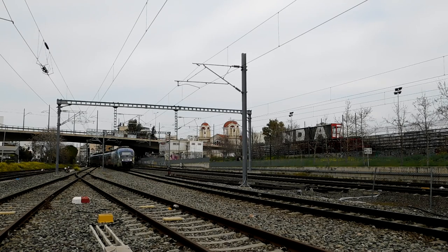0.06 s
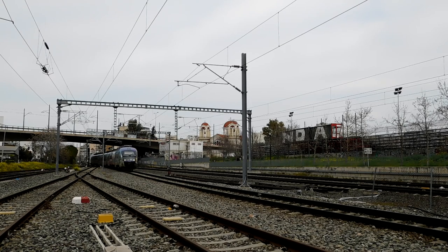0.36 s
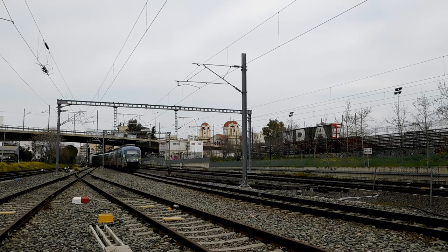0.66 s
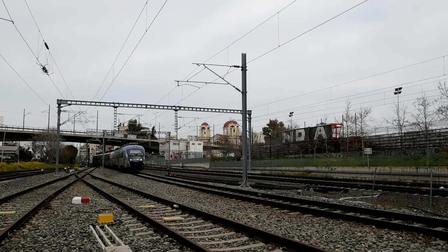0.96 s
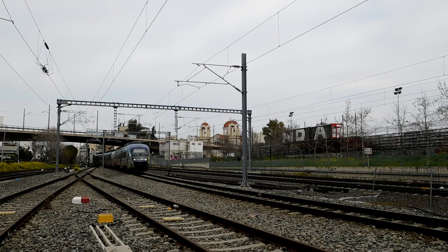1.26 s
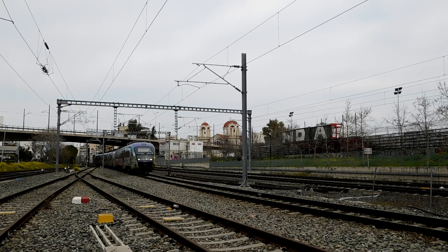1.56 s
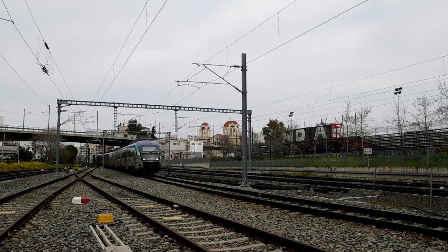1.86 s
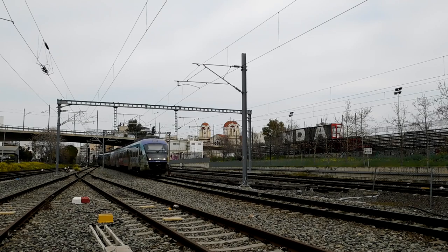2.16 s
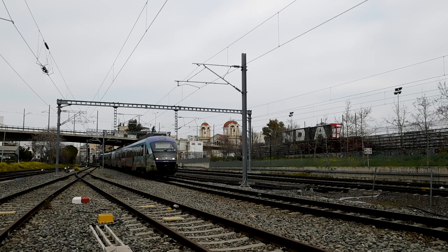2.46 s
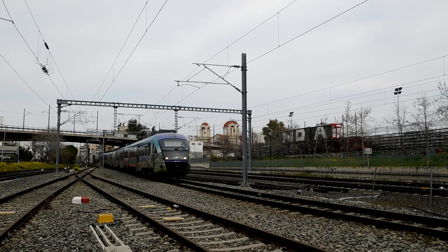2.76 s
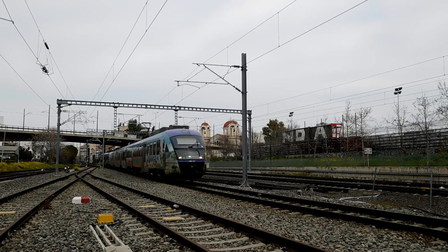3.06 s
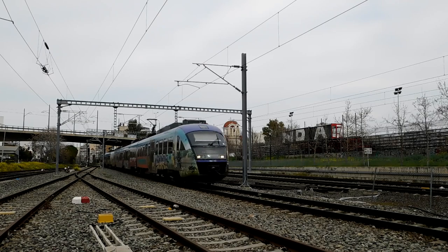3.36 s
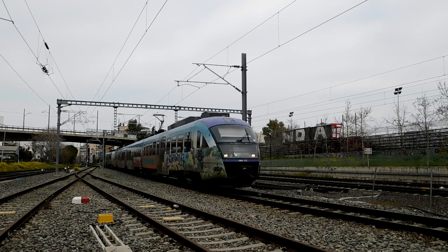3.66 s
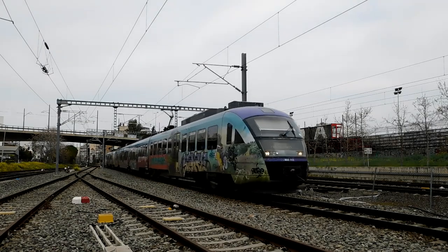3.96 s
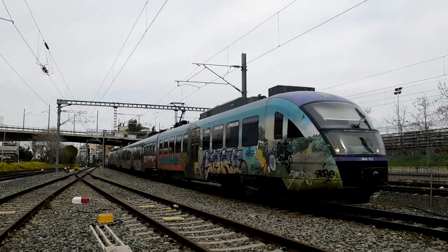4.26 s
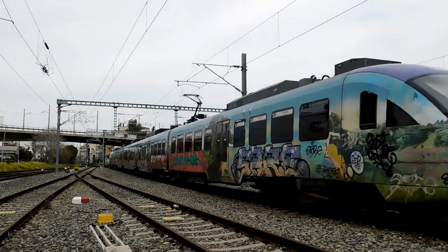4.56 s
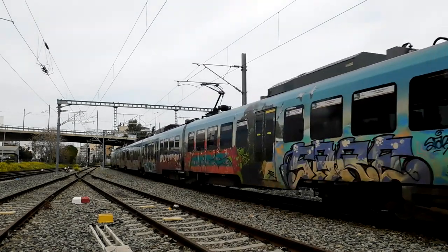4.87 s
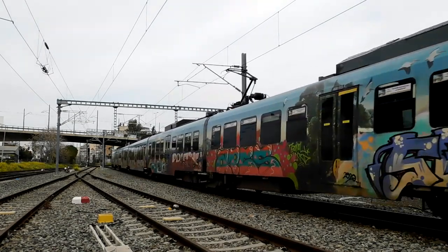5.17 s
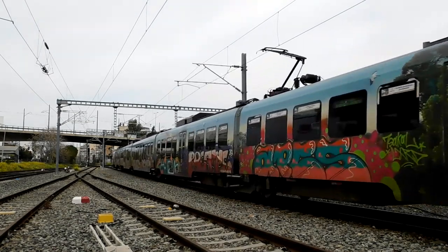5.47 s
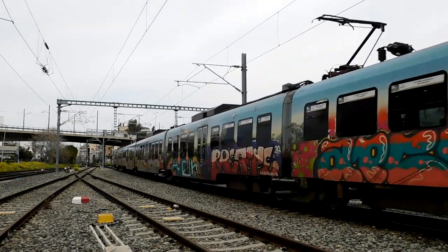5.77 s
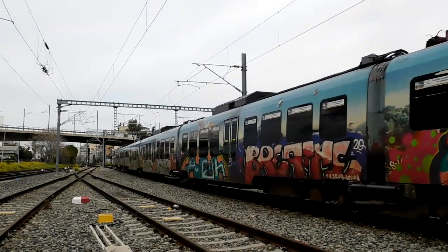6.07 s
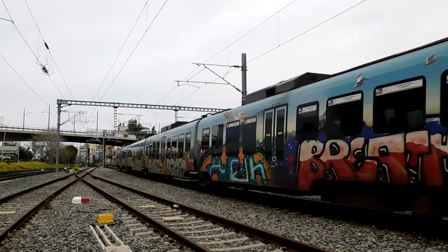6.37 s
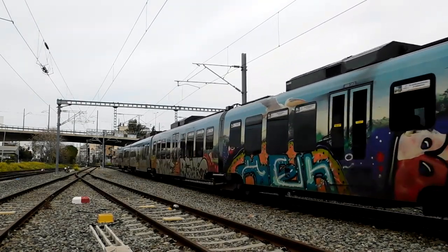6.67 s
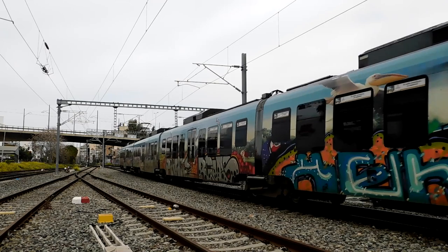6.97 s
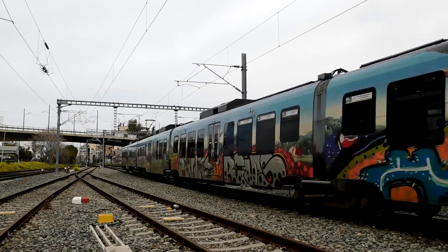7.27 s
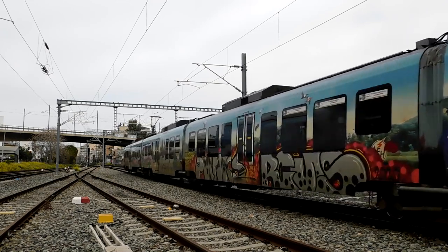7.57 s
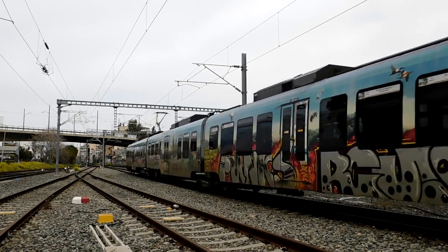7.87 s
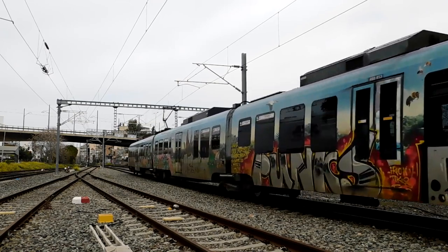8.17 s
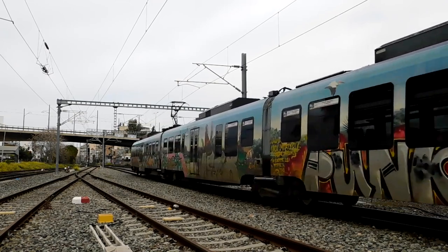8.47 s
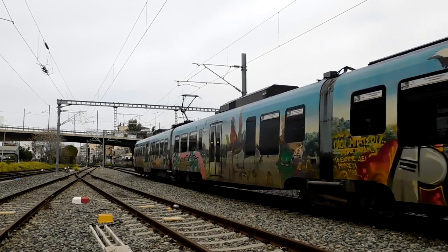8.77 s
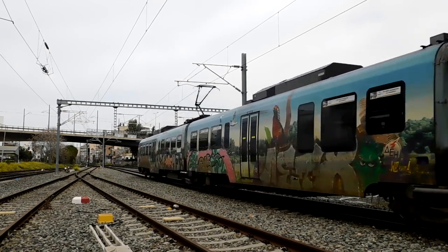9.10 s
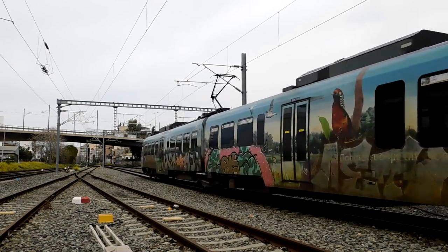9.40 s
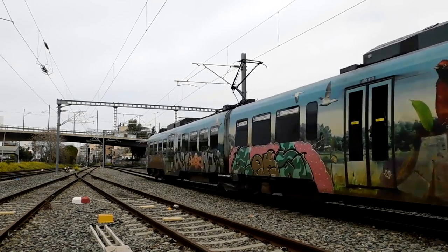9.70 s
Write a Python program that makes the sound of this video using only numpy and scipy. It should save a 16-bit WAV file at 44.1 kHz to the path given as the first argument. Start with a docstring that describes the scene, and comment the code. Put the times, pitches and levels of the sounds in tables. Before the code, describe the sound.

An electric passenger train approaches outdoors on a curve. For the first two and a half seconds there is a dull rolling roar, with a few knocks over rail joints, bright steel ticks, light scraping and faint squeals. At about 2.6 seconds a loud, shrill squeal breaks out and a broad, fluttering hiss starts suddenly with it, followed by more knocks around 3.3 seconds. From about 4 seconds the train passes close by, and the sound becomes wider and fuller. The wheels squeal in overlapping high tones that keep changing pitch, over rough, lower metallic ringing. Hiss, ringing steel and low rumble swell with each set of wheels, at roughly 4, 5.5, 7 and 8.5 seconds, and the motors whine softly underneath. Single dull knocks come near 5.2, 6.4 and 9.2 seconds. The rumble dips briefly around 9.5 seconds, then swells again, with the train still passing at 10 seconds.

```python
"""A dull roar with knocks and light scraping grows into loud hissing and squealing: an electric
passenger train rounds a curve and passes close by. Wheels roar on the rails and knock over the joints.
A broad, fluttering hiss starts suddenly with the first loud squeal. With each bogie (a set of wheels
under a car) the hiss, ringing steel and rumble swell. The wheels stick and slip, squealing in
one mode (a natural way of ringing) after another, and the motors whine as they go by."""
import sys
import numpy as np
from scipy.fft import rfft, irfft, next_fast_len
from scipy.io import wavfile
from scipy.ndimage import map_coordinates

SR = 44100
rng = np.random.default_rng(int(sys.argv[2]) if len(sys.argv) > 2 else 0)


def transcribe(u):
    """Save the signal u as a 16-bit wav file named by the first command-line argument.

    u: samples, shape (n,) or (channels, n), limited to [-1, 1]; the rate is SR.
    q: integer samples, one column per channel.
    """
    v = np.clip(np.atleast_2d(u).T, -1, 1)
    q = np.round(v * 32767).astype(np.int16)
    wavfile.write(sys.argv[1], SR, q)


N = 438354

# how alike left and right sound, for the far and the near train: f/Hz, likeness/0-1
FAR_LIKENESS = [(200, 1), (700, 0.93), (1400, 0.61), (3000, 0.36)]
NEAR_LIKENESS = [(150, 0.091), (400, 0.38), (800, 0.35), (2000, 0.44), (5000, 0.286), (10000, .15)]


def squeals(drive_db):
    """Each mode sounds softly as the wheels roll, and swells when a wheel locks into it."""
    # name: tones/Hz, width/Hz, roughness/0-1, jitter/Hz, left over right/dB, rolling level/dB
    modes = { "shriek": ([4995, 5085], 320, .7, 28, -1.5, -70), "overtones": ([11000, 10150, 12100],
             900, .35, 18, -5, -50), "low": ([4919, 4995], 250, 0.74, 9, .5, -58.5),
             "main": ([6087, 6165, 6225], 280, 0.55, 13, -1, -31.5), "high": ([6977, 7043],
             320, 0.71, 9.95, -1, -49), "sharp": ([8207, 8230, 8330], 230, 0.5, 19, -4, -38),
             "upper": ([9305], 250, .7, 20, -3, -43), "thin": ([11335, 11360, 11480],
             280, .42, 23.8, -4, -43), "whistle": ([14222, 14665], 700, .68, 6, -3, -55),
             "top": ([14480, 14770], 450, .8, 14, -2, -54.5)}
    # a wheel locks into a mode: name, start/s, hold/s, level/dB, rise/s, fade/s
    locks = [("main", 0, 0.19, -54, .3, 0.31), ("low", 0, 0.22, -56, .3, .2),
             ("low", 0.38, .015, -45, .01, .08), ("shriek", 0.69, .28, -49, .6, .4),
             ("main", 1.12, .05, -39, .5, 0.352), ("main", 2.22, .08, -43.5, 0.6, 0.36),
             ("shriek", 2.585, 0.2, -23, 0.015, .32), ("overtones", 2.59, 0.235, -36, 0.027, .3),
             ("sharp", 2.82, .15, -35.5, 0.29, .5), ("main", 2.78, .05, -30.5, 0.19, .7),
             ("whistle", 2.95, 1.2, -34.5, .25, .8), ("whistle", 4.4, .52, -32.5, .9, .2),
             ("high", 3.03, 0.6, -20.5, 0.342, 1.2), ("high", 4.18, 0.36, -27, .5, 0.76),
             ("high", 4.7, .25, -31, .4, 0.24), ("low", 4.24, 0.57, -23, 0.46, .7),
             ("main", 4.3, 1.05, -26, 0.57, .6), ("sharp", 4.36, .04, -29, 0.24, 0.2),
             ("thin", 5.52, .08, -32, .5, .8), ("main", 5.52, 0.32, -23.5, 0.44, 0.91),
             ("thin", 6, 0.41, -31, .6, 1.2), ("sharp", 6.16, .03, -26.5, 0.13, .15),
             ("upper", 6.1, .12, -33, .5, .25), ("main", 6.75, 0.68, -20, 0.59, .55),
             ("top", 6.995, 0.34, -31.7, 1.1, .7), ("thin", 7.58, 0.292, -23, 0.59, .14),
             ("main", 8.08, 0.118, -27, .2, 1), ("thin", 8.35, 0.67, -29.5, .3, 0.59),
             ("sharp", 8.27, .05, -32.5, .5, .4), ("sharp", 9, 0.21, -31.5, .4, 0.64),
             ("main", 9.38, 0.055, -29.5, .3, .25), ("main", 9.9, .1, -24, .4, .5)]
    out = np.zeros((2, N))
    for name, (*timbre, rolling_db) in modes.items():
        locked = swells([row for mode, *row in locks if mode == name])
        out += np.hypot(locked, amp(rolling_db + drive_db)) * wheel_voice(*timbre)
    return out


def singing(drive_db):
    """Short slips keep the lower wheel modes ringing in rough, shifting bursts."""
    # name: tones/Hz, width/Hz, roughness/0-1, rolling level/dB
    modes = {"first": ([1630, 1695], 190, 0.87, -42), "second": ([2070, 2105], 150, .68, -34.5),
             "third": ([3037, 3060], 150, .75, -38.5), "fourth": ([4055, 4095], 190, 0.77, -30),
             "fifth": ([5090, 5170], 200, .85, -31)}
    # a slip makes one mode flare up: name, start/s, hold/s, level/dB
    slips = [("fourth", 3.85, 0.27, -28.5), ("second", 4.11, .04, -33), ("fifth", 5.27, 0.09, -27.5),
             ("second", 5.42, 0.23, -31.5), ("third", 5.44, 0.375, -29.5), ("fifth", 6.2, 0.37, -27.5),
             ("fourth", 6.35, 0.108, -29), ("first", 6.38, 0.22, -37), ("fifth", 7.45, .15, -28),
             ("second", 7.9, 0.21, -29), ("fifth", 8.02, 0.835, -24.5), ("first", 8.14, 0.24, -28),
             ("fourth", 8.25, 0.39, -30.5), ("third", 8.55, .15, -32), ("second", 8.9, 0.36, -29),
             ("fourth", 9.24, 0.067, -28), ("second", 9.65, .03, -26.5), ("second", 9.82, .1, -25),
             ("third", 9.68, 0.252, -36), ("fifth", 9.75, .2, -28), ("fourth", 9.87, .07, -24)]
    rise_s, fade_s = 0.2, 0.495
    out = np.zeros((2, N))
    for name, (*timbre, rolling_db) in modes.items():
        flares = swells([(*row, rise_s, fade_s) for mode, *row in slips if mode == name])
        voice = wheel_voice(*timbre, jitter_hz=18, left_db=0)
        out += np.hypot(flares, amp(rolling_db + drive_db)) * amp(1.94 * wobble(14)) * voice
    return out


def wheel_voice(tones_hz, width_hz, roughness, jitter_hz, left_db):
    """Wheels of slightly different size ring in one mode; uneven stick and slip smears it into a band."""
    tones = np.zeros((2, N))
    for hz in tones_hz:
        pitch = hz + 9 * wobble(5) + jitter_hz * wobble(170)
        phase = 2 * np.pi * np.cumsum(pitch) / SR
        grip = amp(4.2 * wobble(11) + 1.7 * wobble(80))
        # shifting echoes off the track stones and the car make left and right fade separately
        tones += [grip * amp(3.6 * wobble(22)) * np.sin(phase + 0.95 * wobble(18)) for _ in range(2)]
    narrow = resonances([(np.mean(tones_hz), width_hz, 0)])
    wide = resonances([(np.mean(tones_hz), 4 * width_hz, 0)])
    slip = noise(lambda hz: narrow(hz) * wide(hz), [(6000, 0.58)])
    voice = np.sqrt(1 - roughness) * unit(tones) + np.sqrt(roughness) * slip
    return pan(voice, left_db)


def scrape_and_hiss(near_db, effort_db):
    """Wheel rims sizzle and scrape lightly; a broad, fluttering hiss starts suddenly with the squeal."""
    # light scrapes while the train is far: start/s, hold/s, level/dB, rise/s, fade/s
    scrapes = [(.04, .02, -53, .02, .2), (.38, .025, -43, .015, .1), (.48, .02, -44, .03, .15),
               (.56, 0.029, -38.5, .03, .3), (.7, 0.219, -36.5, .25, .17), (1.71, 0.26, -40.5, 0.038, 0.35)]
    # tone colours of the scraping, hiss and sizzle: f/Hz, level/dB
    scrape_colour = [(2500, -20), (3700, 3), (4500, -18), (5200, 5), (5900, -2), (6500, -21), (7150, 8),
                     (7600, -9), (8200, 10), (9300, -15), (11000, -3.5), (12200, 2.5), (14700, -1),
                     (15800, -14)]
    hiss_colour = [(100, -8), (1000, -5), (4500, 3), (7500, 2.5), (9000, 1.5), (11000, 1), (12400, 0.5),
                   (13500, -1.5), (15000, -7), (15800, -5)]
    sizzle_colour = [(2500, -7), (5000, -12), (8000, 3), (15500, -9)]
    hiss_share, = curves([(2.569, 0), (2.579, 0.9)])  # t/s, share/0-1
    scrape_gain = swells(scrapes) * amp(1.9 * wobble(90))
    scrape = scrape_gain * noise(colour(scrape_colour), [(8000, 0.58)], left_db=-4.5)
    sizzle_db = np.minimum(-24.5 + 1.4 * near_db, -43.5) + 1.5 * wobble(130)
    sizzle = amp(sizzle_db) * noise(colour(sizzle_colour), [(8000, 0.24)])
    flutter_db = 0.56 * wobble(8) + 0.67 * wobble(25) + 0.65 * wobble(200)
    hiss_db = -22 + 0.26 * near_db + 0.88 * effort_db + flutter_db
    hiss = amp(hiss_db) * noise(colour(hiss_colour), [(8000, 0.11)], left_db=-2.2)
    return (1 - hiss_share) * (scrape + sizzle) + hiss_share * hiss


def rolling_roar():
    """The roar of wheels on rails changes colour and widens as the train comes close."""
    # loudness of the roar: t/s, level/dB
    levels = [(0, -31.5), (1.4, -31), (2.3, -29), (5, -29.4), (5.25, -26), (5.85, -29), (6.45, -28.2),
              (7.1, -31.5), (8.2, -29.5), (9, -29.5), (9.75, -26.5), (9.94, -28)]
    # its tone colour at three distances: f/Hz, level/dB
    far_colour = [(35, -53), (60, -16), (87, -22.5), (118, -29), (173, -18), (265, -20.5), (412, -2.5),
                  (500, -11), (594, -1.5), (962, -0.5), (1260, -3.5), (1420, -6.5), (1660, -4), (2000, -8),
                  (2330, -9.5), (2570, -14), (4410, -26.5), (6000, -35.5), (7800, -54), (13200, -120)]
    middle_colour = [(88, -50), (150, -37), (346, -10), (483, -13), (599, -5), (770, 0.5), (977, -5),
                     (1170, -8.5), (1430, -13), (1660, -8), (1900, -10), (2600, -16), (3380, -37.5),
                     (5720, -120)]
    close_colour = [(88, -34), (150, -11), (489, -3), (575, -2.5), (627, -1), (968, 0.5), (1100, 1),
                    (1320, -2.5), (1870, -5.5), (2000, -8.5), (2600, -43), (4400, -120)]
    # t/s, blend from far to middle/0-1, blend from those to close/0-1
    to_middle, to_close = curves([(2.0, 0, 0), (2.6, 0.96, 0), (3.6, 0.94, 0.12), (4.4, 1, 0.97)])
    roar_db, = curves(levels)
    far = amp(3.0) * noise(colour(far_colour), FAR_LIKENESS, left_db=2.0)
    middle = amp(0.94) * noise(colour(middle_colour), FAR_LIKENESS, left_db=2.5)
    close = amp(2.5) * noise(colour(close_colour), NEAR_LIKENESS, left_db=2.5)
    approach = np.sqrt(1 - to_middle) * far + np.sqrt(to_middle) * middle
    roar = np.sqrt(1 - to_close) * approach + np.sqrt(to_close) * close
    return amp(roar_db + 0.6 * wobble(12) + 0.85 * wobble(70)) * roar


def steel_and_rumble(near_db, effort_db):
    """Rough steel sets the rails and wheels ringing; the passing cars rumble."""
    # tone colours of the rails and the cars: f/Hz, level/dB
    rail_colour = [(700, -20), (1500, -5.5), (2200, 2.5), (2750, 1), (3500, 0.5), (4600, 2), (5600, -1),
                   (7000, -9), (10000, -13), (16000, -29)]
    rumble_colour = [(15, -6.5), (30, 1.5), (55, -1), (78, 1), (110, 0.5), (200, -2), (400, -3.5),
                     (1000, -43)]
    # modes of a rolling wheel: f/Hz, width/Hz, level/dB
    wheel_modes = [(1680, 167, -4.5), (2370, 300, 2.5), (3160, 180, 3), (6100, 180, -0.5), (7210, 140, 2),
                   (9480, 150, -6), (12150, 160, -9)]
    # the wheels ring more freely as they come near: t/s, level/dB
    ringing = [(4, -4.5), (5.4, 1), (8.8, .8), (9.94, 2)]
    # far wheels grind on the rail: start/s, hold/s, level/dB, rise/s, fade/s
    far_grinds = [(.03, 0.069, -46.5, 0.091, 0.28), (1, 0.067, -39, 0.71, 0.55), (3.75, 0.132, -37, .3, .4)]
    # the rumble dips briefly before the last bogie: t/s, level/dB
    lull = [(9.15, 0), (9.45, -8.5), (9.58, -7), (9.7, 1)]
    ring_db, = curves(ringing)
    lull_db, = curves(lull)
    rail = amp(3.5) * noise(colour(rail_colour), NEAR_LIKENESS)
    wheels = amp(ring_db + 1.64 * wobble(9)) * noise(resonances(wheel_modes), NEAR_LIKENESS)
    steel_gain = np.hypot(amp(-27.0 + 0.98 * near_db + 0.41 * effort_db), swells(far_grinds))
    rumble_db = -36.5 + 1.2 * near_db + 0.6 * effort_db + lull_db
    rumble = amp(rumble_db + 0.8 * wobble(7)) * noise(colour(rumble_colour), [(100, 0.05)])
    flutter = amp(1.155 * wobble(40) + 0.67 * wobble(8))
    return steel_gain * flutter * (rail + wheels) + rumble


def knocks_and_ticks():
    """Wheels knock dully over rail joints, each with a short clatter; slipping steel ticks brightly."""
    # joint knocks and steel ticks: t/s, strength/dB
    knocks = [(0.211, -17), (0.392, -14), (1.659, -15), (1.899, -19.5), (2.513, -22), (2.572, -16),
              (2.597, -19), (3.179, -22), (3.334, -15), (3.414, -27), (5.229, -13.5), (6.449, -14.5),
              (9.244, -16.5)]
    ticks = [(0.2783, -43), (0.3765, -33), (0.47, -37), (0.55, -33), (0.9694, -33), (1.0165, -23),
             (1.6072, -31), (1.6248, -29), (1.66, -33), (1.6841, -27), (2.0163, -31), (2.0652, -24),
             (2.2852, -27), (2.3486, -27), (2.3979, -23.5)]
    # their tone colours: f/Hz, level/dB
    knock_colour = [(150, -13), (400, 1), (600, 10.5), (850, 12.5), (1500, -9), (4000, -32)]
    tick_colour = [(2000, -16), (5000, 3), (8000, -3), (13000, -5), (16000, -6)]
    dull = noise(colour(knock_colour), FAR_LIKENESS, left_db=3.0)
    bright = noise(colour(tick_colour), [(8000, 0.3)], left_db=-1.5)
    thump = amp(-5) * blows(knocks, attack_s=0.0006, decay_s=0.06)
    clatter = amp(-20) * blows(knocks, attack_s=0.01, decay_s=0.35)
    snap = amp(-3.5) * blows(ticks, attack_s=0.00044, decay_s=0.041)
    return (thump + clatter) * dull + snap * bright


def motor_whine():
    """The drive whines; its pitch sags as the front car passes and returns with the next."""
    # each motor goes by: t/s, level/dB
    motors = [(3.95, -36), (4.5, -40), (5, -33.5), (6.2, -35), (7.8, -35.5), (9.1, -32), (9.8, -29)]
    rise_s, fade_s = 0.7, 0.41
    level = swells([(s, 0, db, rise_s, fade_s) for s, db in motors])
    pitch, = curves([(3.8, 1090), (4.6, 1064), (5.1, 1013), (5.4, 1120),  # t/s, f/Hz
                     (6.3, 1138), (7.8, 1117), (9.94, 1121)])
    phase = 2 * np.pi * np.cumsum(pitch + 9 * wobble(30)) / SR
    whine = np.array([amp(4.8 * wobble(16)) * np.sin(phase + 0.83 * wobble(20)) for _ in range(2)])
    return amp(0.3) * level * unit(whine)


def nearness_db():
    """Sound weakens with distance; 0 dB once the train arrives, as some car is then always near."""
    arrival_s, speed_m_per_s, track_distance_m = 3.86, 18, 4.9
    ahead_m = speed_m_per_s * np.maximum(arrival_s - np.arange(N) / SR, 0)
    return 20 * np.log10(track_distance_m / np.hypot(track_distance_m, ahead_m))


def grinding_db():
    """How hard steel works on steel: one swell for each bogie."""
    # bogies grind through the curve: start/s, hold/s, effort/dB, rise/s, fade/s
    bogies = [(2.583, 0.39, 0.5, 0.069, .8), (4.047, 0.92, 0, 0.83, 0.67), (5.42, 0.63, .8, 0.67, 0.41),
              (6.65, 0.97, -0.6, 1, .8), (8.06, 0.88, 1.1, 0.57, 0.81), (9.66, .3, -1.5, 0.24, 0.88)]
    between_bogies_db = -12
    return 20 * np.log10(np.hypot(swells(bogies), amp(between_bogies_db)))


def amp(db):
    """Turn decibels into a gain."""
    return 10 ** (np.asarray(db) / 20)


def unit(x):
    """Scale a signal to an average (rms) level of 1."""
    return x / np.sqrt(np.mean(x ** 2) + 1e-20)


def pan(stereo, left_db):
    """Raise the left side by left_db compared with the right."""
    return stereo * amp([[left_db / 2], [-left_db / 2]])


def along(points, hz):
    """Read between (f/Hz, value) points on a logarithmic frequency scale."""
    f, values = np.transpose(points)
    return np.interp(np.log(hz + 1), np.log(f + 1), values)


def curves(rows):
    """Join (t/s, values...) rows with straight lines: one curve per value column."""
    times, *columns = np.transpose(rows)
    return [np.interp(np.arange(N) / SR, times, column) for column in columns]


def wobble(rate):
    """A smooth curve through `rate` random values a second."""
    knots = rng.standard_normal(int(N * rate / SR) + 4)
    coarse = np.arange(0, N, 16)
    return np.interp(np.arange(N), coarse, map_coordinates(knots, [coarse * rate / SR]))


def filtered(x, response):
    """Multiply each frequency in x by response(hz)."""
    size = next_fast_len(N + SR // 4, True)
    return irfft(rfft(x, size) * response(np.fft.rfftfreq(size, 1 / SR)), size)[..., :N]


def colour(points):
    """A filter shape through (f/Hz, level/dB) points."""
    return lambda hz: amp(along(points, hz))


def resonances(modes):
    """A filter shape with one peak for each (f/Hz, width/Hz, level/dB) mode."""
    return lambda hz: np.sqrt(sum(
        (amp(db) * hz * width) ** 2 / ((peak ** 2 - hz ** 2) ** 2 + (hz * width) ** 2)
        for peak, width, db in modes))


def noise(response, likeness, left_db=0):
    """Filtered stereo noise of level 1; (f/Hz, likeness/0-1) points say how alike the sides are."""
    def shape(hz):
        angle = np.arccos(np.clip(along(likeness, hz), -1, 1)) / 2
        return response(hz) * np.array([np.cos(angle), np.sin(angle)])
    mid, side = filtered(rng.standard_normal((2, N)), shape)
    return unit(pan(np.array([mid + side, mid - side]), left_db))


def blows(events, attack_s, decay_s):
    """A gain that jumps at each (t/s, level/dB) event, then falls 60 dB in decay_s."""
    envelope, t = np.zeros(N + SR), np.arange(SR // 2) / SR
    for s, db in events:
        envelope[round(s * SR):][:len(t)] += amp(db - 60 * t / decay_s) * (1 - np.exp(-t / attack_s))
    return envelope[:N]


def swell(start, hold, db, rise, fade):
    """A gain that climbs until start, holds and dies away; rise and fade are seconds per 20 dB."""
    t = np.arange(0, N + 64, 64) / SR
    below = np.maximum(start - t, 0) / rise + np.maximum(t - start - hold, 0) / fade
    return np.interp(np.arange(N) / SR, t, amp(db - 20 * np.minimum(below, 10)))


def swells(rows):
    """The joint gain of overlapping swells: their powers add."""
    return np.sqrt(sum(swell(*row) ** 2 for row in rows))


def scene():
    """Nearness and grinding drive the steel; the train is on the right, so the left hears it later."""
    near_db, effort_db = nearness_db(), grinding_db()
    drive_db = 1.56 * near_db + 0.36 * effort_db
    train = (rolling_roar() + steel_and_rumble(near_db, effort_db) + motor_whine()
             + scrape_and_hiss(near_db, effort_db) + singing(drive_db) + squeals(drive_db)
             + knocks_and_ticks())
    left_lag_s = 0.000136
    return filtered(train, lambda hz: np.exp(1j * np.pi * hz * left_lag_s * np.array([[-1], [1]])))


def record(dry):
    """The microphone rounds off the highest peaks and cuts the very top of the treble."""
    ceiling, top_hz = 0.66, 15800
    rounded = dry / (1 + np.abs(dry / ceiling) ** 6) ** (1 / 6)
    return filtered(rounded, lambda hz: hz < top_hz)


dry = scene()
out = record(dry)
transcribe(out)
```